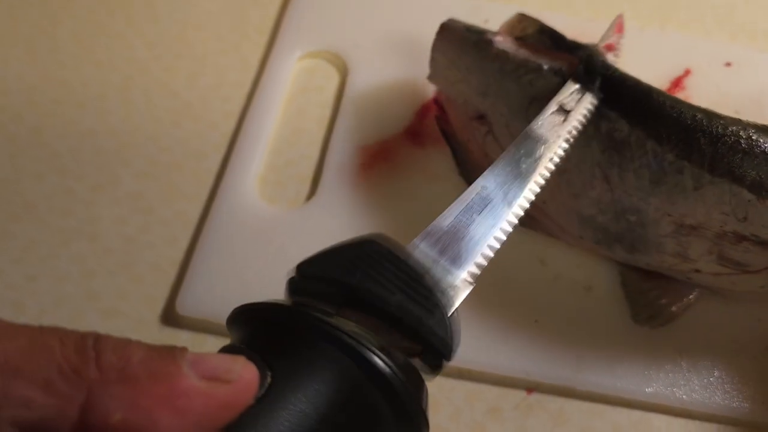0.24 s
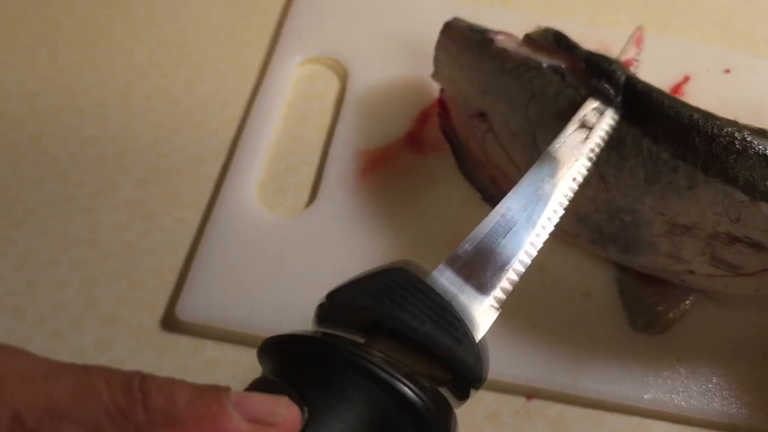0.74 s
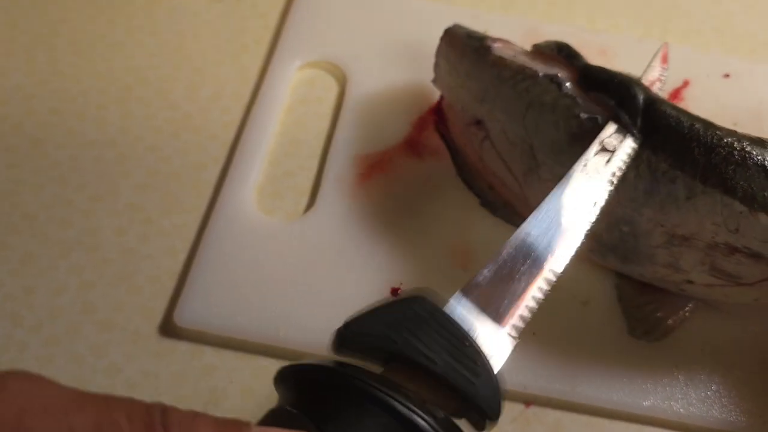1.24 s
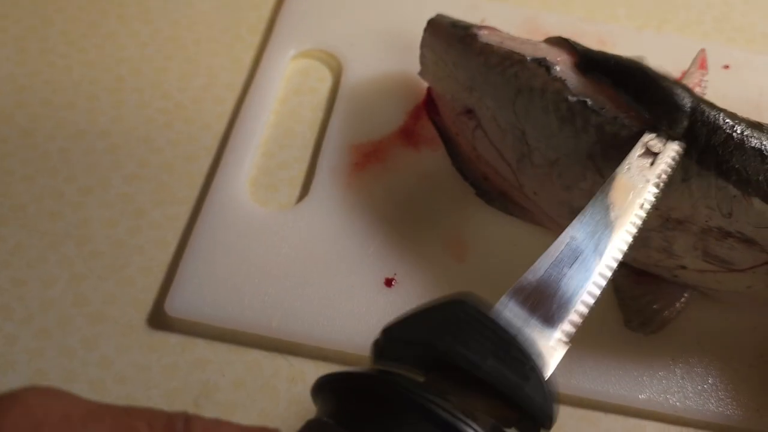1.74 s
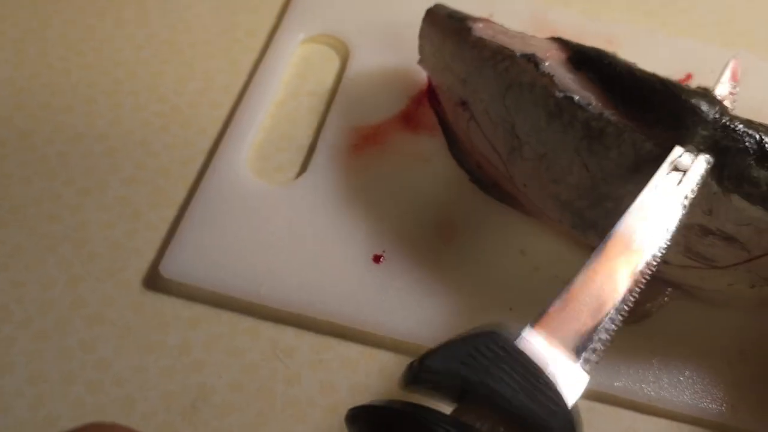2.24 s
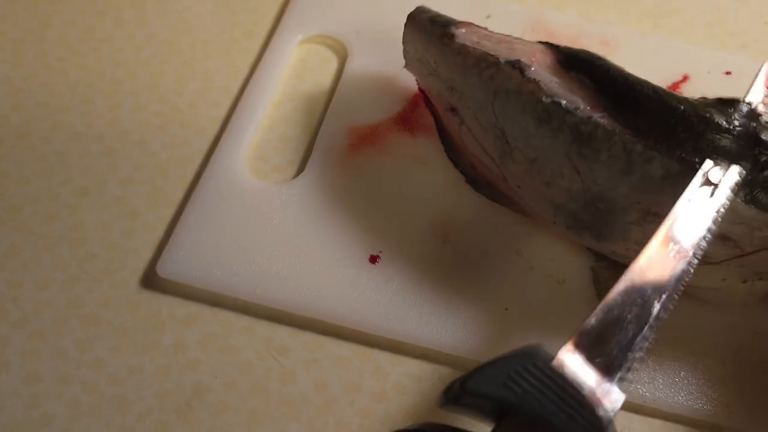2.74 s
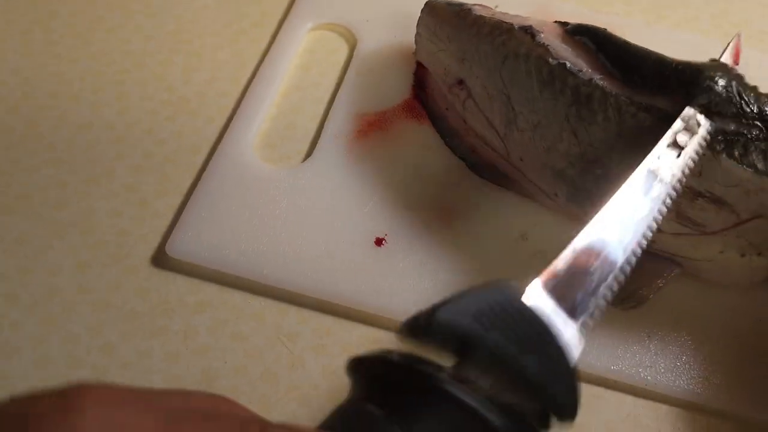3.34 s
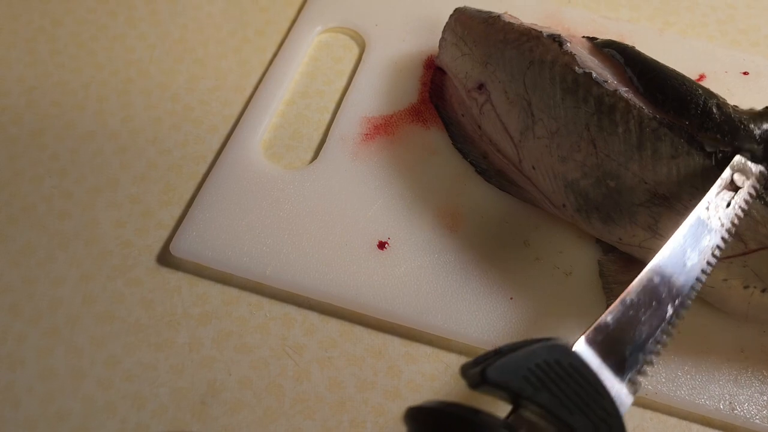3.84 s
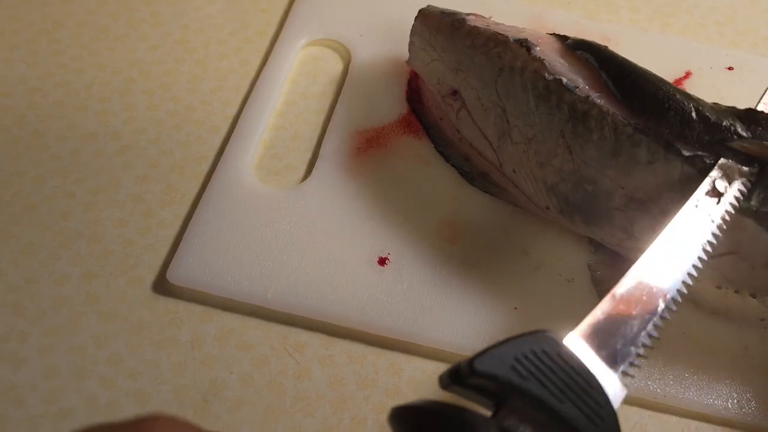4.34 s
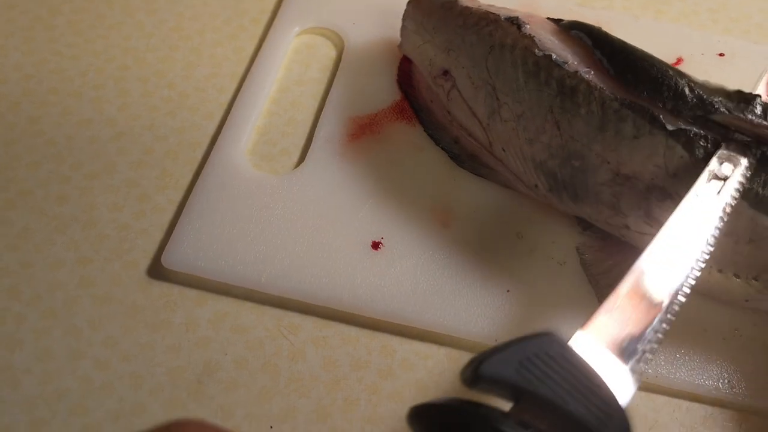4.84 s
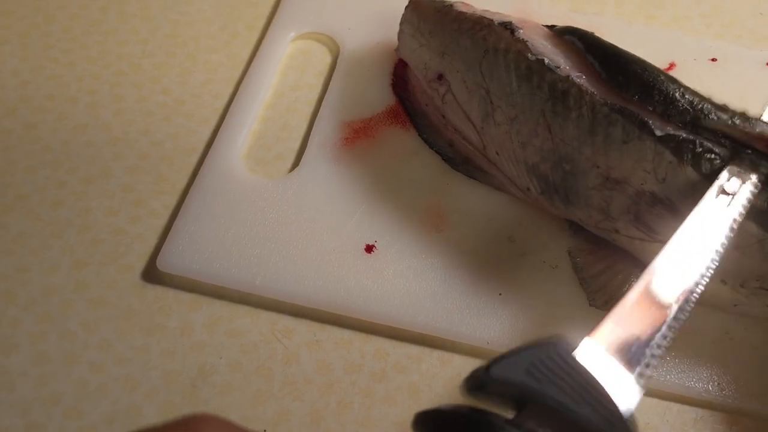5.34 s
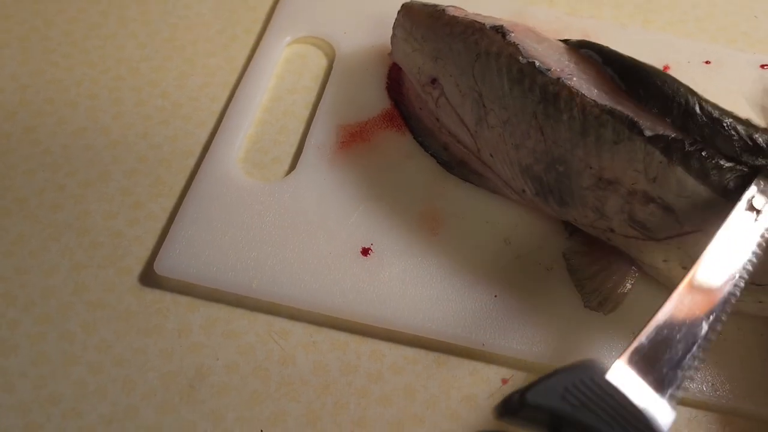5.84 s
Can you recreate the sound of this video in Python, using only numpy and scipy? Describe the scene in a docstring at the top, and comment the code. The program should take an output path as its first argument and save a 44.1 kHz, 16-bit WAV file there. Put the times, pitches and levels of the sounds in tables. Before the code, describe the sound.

Gritty, chattering buzz of an electric fillet knife cutting fish in a kitchen, winding down with loose clacks and starting again.

```python
"""A gritty, chattering buzz: an electric fillet knife is sawing through a fish on a kitchen board.
A geared motor drives two blades to and fro: steel rasps on steel, the drive knocks in its plastic
housing, the motor whines and the shaking handle hums. The knife coasts to a stop with loose clacks,
rests among soft rubs, bumps and ticks, then jolts back to speed. Counter and walls throw the rasp,
knocks, clacks and ticks back over a low room tone."""
import sys
import numpy as np
from scipy import signal
from scipy.fft import rfft, irfft, next_fast_len
from scipy.io import wavfile
from scipy.ndimage import uniform_filter1d

SR = 44100
rng = np.random.default_rng(int(sys.argv[2]) if len(sys.argv) > 2 else 0)


def master(y):
    """Save y as 16-bit WAV."""
    cut = np.clip(np.atleast_2d(y).T, -1, 1)
    pcm = np.round(cut * 32767)  # scale
    wavfile.write(sys.argv[1], SR, pcm.astype(np.int16))


N = 269451
T = np.arange(N) / SR
RELEASE_S, RESTART_S = 3.281, 4.645  # the trigger is let go, then squeezed again


def amp(db):
    """Decibels to gain."""
    return 10 ** (np.asarray(db) / 20)


def curve(rows):
    """Automation lane: straight lines through (time_s, value) rows."""
    return np.interp(T, *np.transpose(rows))


def swells(rows):
    """Bell-shaped fades up and down, one a row."""
    return sum(amp(db) * np.exp(-((T - middle) / half) ** 2) for middle, half, db in rows)


def at_pitch(rows, hz):
    """Reads (freq_hz, value) rows on a log-frequency axis."""
    freqs, values = np.transpose(rows)
    return np.interp(np.log(hz + 1), np.log(freqs + 1), values)


def add(mix, start_s, sound):
    """Drops a sound onto a mono or stereo track."""
    part = mix[..., round(start_s * SR):][..., :sound.shape[-1]]
    part += sound[..., :part.shape[-1]]


def colour(x, spectrum, modes=()):
    """Minimum-phase EQ of unit energy: a broad curve with resonant peaks on it."""
    hz = np.fft.rfftfreq(4096, 1 / SR)
    peaks = sum(amp(db) / (1 + (2 * (hz - pitch) / width) ** 2) for pitch, width, db in modes)
    gain = amp(at_pitch(spectrum, hz)) * (1 + peaks)
    log_gain = np.log(np.r_[gain, gain[-2:0:-1]])
    taps = np.fft.ifft(np.exp(np.conj(signal.hilbert(log_gain)))).real
    return signal.oaconvolve(x, taps / np.linalg.norm(taps))[:N]


def resonate(x, pitch_hz, width_hz):
    """Rings one damped mode."""
    pole = np.exp((2j * np.pi * pitch_hz - np.pi * width_hz) / SR)
    return signal.lfilter([1], [1, -pole], x).real


def drift(hz):
    """Random modulation of unit rms, rolling off above hz."""
    size = next_fast_len(N)
    rolloff = 1 + (np.fft.rfftfreq(size, 1 / SR) / hz) ** 4
    wander = irfft(rfft(rng.standard_normal(size)) / rolloff, size)[:N]
    return wander / np.sqrt(np.mean(wander ** 2))


def steady(x):
    """Leveller: rides a running sound towards unit rms."""
    power = uniform_filter1d(uniform_filter1d(x ** 2, 5000), 5000)
    return x / np.sqrt(abs(power) + np.mean(power) / 100)


def tones(turns, partials, waver_db):
    """Wavering sines on multiples of a rotation."""
    return sum(amp(db + waver_db * drift(hz=5.1)) * np.sqrt(2)
               * np.sin(2 * np.pi * (multiple * turns + rng.random())) for multiple, db in partials)


def once_a_stroke(strokes, place, jitter_s, spread_db):
    """One click each time the blades pass a place in the stroke, uneven in time and force."""
    when = np.interp(np.arange(int(strokes[-1])) + place, strokes, T)
    late, force = rng.standard_normal((len(when), 2)).T
    samples = np.round((when + jitter_s * late) * SR).astype(int)
    clicks = np.zeros(N)
    clicks[np.clip(samples, 0, N - 1)] = amp(spread_db * np.clip(force, -1.5, 1.2))
    return clicks


# Pace of the powered motor, sagging in the flesh: time_s, strokes_per_s
MOTOR_PACE = [(0, 37.23), (.75, 37.15), (1.5, 36.58), (1.9, 37.11), (2.2, 37.11), (2.55, 36.64),
              (3.1, 36.38), (3.3, 37.53), (5, 37.09), (5.45, 36.31), (5.65, 36.36), (6.1, 35.67)]

def stroke_rate(coast_s=1.439, friction_per_s2=24.22, spin_up_s=0.053):
    """Strokes a second: the motor runs, air drag and dry friction stop it, current spins it up."""
    pace = curve(MOTOR_PACE)
    brake = friction_per_s2 * coast_s
    coast = (np.interp(RELEASE_S, T, pace) + brake) * np.exp(-(T - RELEASE_S) / coast_s) - brake
    spin_up = pace * (1 - np.exp(-np.maximum(T - RESTART_S, 0) / spin_up_s))
    return np.where(T < RELEASE_S, pace, np.maximum(coast, spin_up))


# The blades slap together as they reverse: place_in_stroke, level_db, decay_strokes
BLADE_SLAPS = [(.925, 2.5, 0.037), (0.96, 5, 0.038), (.42, 3, 0.033), (.475, 3.5, 0.086)]
# Broad, gritty EQ of the rasp: freq_hz, gain_db
RASP_EQ = [(100, -12), (300, -6), (600, 1), (950, -4.5), (2000, 2), (2500, -1), (4200, -3), (5500, -1),
           (8000, -3), (9500, -2), (10100, -8), (12700, -8), (14500, -4.5), (16000, -12)]
# Resonances of the blades: pitch_hz, width_hz, gain_db
BLADE_RESONANCES = [(984, 124, 2.5), (3025, 250, -3.5), (4350, 720, -4), (7500, 200, -12), (8800, 580, -13),
                    (11460, 240, 0)]
# Bright sheen of slapped steel: freq_hz, gain_db
STEEL_EQ = [(1000, -26), (3300, -36), (4400, -20.5), (5500, -5), (6700, -9.5), (7350, -0.5), (8100, -6.5),
            (9300, -0.5), (10100, -13), (11500, -4), (12500, -9), (16000, -27)]
# Spells in which the blades also catch in mid-stroke: start_s, end_s
BLADE_CATCHES = [(1.56, 2.36), (3.29, 3.47)]

def blade_rasp(strokes, speed, bite_db, slide_db=-3.5, grain_db=2, catch_fade_s=0.35):
    """Steel slides on steel and flares at each slap; the long blades send each side different grit."""
    def flare(place, decay_strokes):
        clicks = once_a_stroke(strokes, place, jitter_s=0.00036, spread_db=2.5)
        fade = np.exp(-np.max(np.diff(strokes)) / decay_strokes)  # decay time is set at full speed
        return abs(uniform_filter1d(signal.lfilter([1], [1, -fade], clicks) ** 2, size=30))

    catching = sum(np.clip(np.minimum(T - start, end - T) / catch_fade_s + 0.5, 0, 1)
                   for start, end in BLADE_CATCHES)
    slap_power = sum(amp(db) ** 2 * flare(place, decay) for place, db, decay in BLADE_SLAPS)
    slap_power += (amp(1) * catching) ** 2 * flare(place=0.21, decay_strokes=0.077)
    slide = amp(slide_db) * np.where(T < RESTART_S, speed ** 0.36, 1)  # coasting leaves mostly slaps
    ring_gain = amp(-12 - 0.15 * bite_db + 5 * catching)  # flesh muffles the steel
    centre, *sides = rng.standard_normal((3, N))
    grain = amp(grain_db * np.clip(drift(hz=1450), -2, 1.6))
    pair = []
    for side in sides:
        grit = grain * (side + 0.24 * centre) * np.sqrt(slap_power + slide ** 2)
        rasp = steady(colour(grit, RASP_EQ, BLADE_RESONANCES))
        ring = steady(colour(rng.standard_normal(N) * np.sqrt(slap_power), STEEL_EQ))
        pair.append(rasp + ring_gain * ring)
    level_db = -26 - 0.03 * bite_db + 0.74 * catching + 0.5 * drift(hz=8.1)
    return amp(level_db) * np.array(pair)


# Play in the drive, taken up in every stroke: place_in_stroke, level_db
KNOCK_PATTERN = [(0.926, 1.5), (0.984, -11), (.085, -6.5), (0.208, -9.5), (0.336, -32.5), (.45, -6.5),
                 (0.525, -6.5), (0.569, -13), (.76, -11.5)]
# Boxy EQ of the plastic housing: freq_hz, gain_db
HOUSING_EQ = [(60, -19.5), (150, -17), (220, -4.5), (300, 0.5), (390, -8), (560, -4.5), (780, -8),
              (930, 0.5), (1400, 2), (2000, -2.5), (2800, -1.5), (6000, -31.5), (16000, -30)]
# Resonances of the housing: pitch_hz, width_hz, gain_db
HOUSING_RESONANCES = [(550, 59, -9), (955, 99, -3), (1300, 85, -9.5), (1570, 78, 0.5), (1888, 71, 7)]
# A growl and a drone swell against the knocks at some depths of the cut: middle_s, half_length_s, gain_db
GROWL_SWELLS = [(2.88, 0.46, -7), (4.9, 0.12, -10.5)]
DRONE_SWELLS = [(3.4, 0.74, -18.5), (5.68, 0.33, -7.5)]

def drive_knocks(strokes, speed, bite_db, rattle_db=-31, rise_db_per_s=0.65):
    """Crank and gear knock the housing; leaning on the blades wakes a growl and a lower drone."""
    clicks = np.zeros(N)
    for place, db in KNOCK_PATTERN:
        force = amp(db + 2.24 * drift(hz=1.2))
        loose_strokes = strokes + 0.004 * drift(hz=1.5)
        clicks += force * once_a_stroke(loose_strokes, place, jitter_s=0.00007, spread_db=1.5)
    rattle = amp(rattle_db) * rng.standard_normal(N)
    housing = steady(colour(speed * clicks + rattle, HOUSING_EQ, HOUSING_RESONANCES))
    growl_gain = amp(-24.5 + 0.8 * bite_db) + swells(GROWL_SWELLS)
    growl = growl_gain * steady(resonate(housing, pitch_hz=1320, width_hz=300))
    drone = swells(DRONE_SWELLS) * steady(resonate(housing, pitch_hz=524, width_hz=77))
    level_db = -35.5 + 0.31 * bite_db + rise_db_per_s * T + 1.13 * drift(hz=8)  # flesh loads the drive
    return amp(level_db) * steady(housing + growl + drone)


GEAR_RATIO, SLOTS = 100 / 12, 12  # motor turns a stroke, slots in the motor
# Partials of the whine: multiple_of_motor_speed, level_db
WHINE_PARTIALS = [(1, -14), (5.5, -20), (SLOTS, 0), (4 * SLOTS, -17)]
# How well the housing radiates the whine as its pitch passes: slot_pitch_hz, gain_db
WHINE_RADIATION = [(300, -35), (520, -13.5), (950, -6), (1400, -17), (2000, -28), (3300, -21), (3620, -1)]

def motor_whine(strokes, rate, bite_db, fade_db_per_s=0.5):
    """The motor's slots sing; play in the gear roughens the tone, most of all when it runs slack."""
    flutter_db = np.interp(rate, [0, rate.max()], [4, 1.5]) * drift(hz=90)
    level_db = -43 - 0.15 * bite_db - fade_db_per_s * T  # fades as the handle moves away
    level_db += at_pitch(WHINE_RADIATION, SLOTS * GEAR_RATIO * rate)
    turns = GEAR_RATIO * strokes + 0.0016 * drift(hz=20)
    return amp(level_db + flutter_db) * (rate > 0) * tones(turns, WHINE_PARTIALS, waver_db=1.5)


# Partials of the shaking handle: multiple_of_stroke_rate, level_db
SHAKE_PARTIALS = [(1, -59.5), (3, -50.5), (4, -56.5), (8, -51)]

def handle_hum(strokes, speed, board_db):
    """The blades shake the handle, and the board too, twice a stroke, as they bite."""
    board = amp(board_db) * tones(strokes, [(2, 0)], waver_db=0.45)
    shake = amp(0.43 * (board_db - np.median(board_db))) * tones(strokes, SHAKE_PARTIALS, waver_db=3.5)
    rumble_eq = [(20, -28), (60, -3), (115, -2.5), (170, -10.5), (400, -14), (2000, -46.5)]
    rumble = amp(-52) * colour(rng.standard_normal(N), rumble_eq)
    return speed ** 3 * (board + shake + rumble)  # slow blades hardly shake anything


# Dark EQ of the room tone: freq_hz, gain_db
ROOM_TONE_EQ = [(30, -20.5), (75, -3.5), (160, -21.5), (280, -27.5), (420, -31), (850, -31), (1200, -42.5),
                (3000, -51.5), (16000, -57.5)]
# Appliance hum: pitch_hz, level_db
APPLIANCE_HUM = [(75, -65.5), (120, -68.5), (240, -73.5)]

def room_tone():
    """A bed of low kitchen noise, mostly centred, with a faint appliance hum."""
    centre, *sides = (colour(rng.standard_normal(N), ROOM_TONE_EQ) for _ in range(3))
    return amp(-58) * (0.82 * centre + 0.36 * np.array(sides)) + tones(T, APPLIANCE_HUM, waver_db=1.5)


# Reverb time of the walls: freq_hz, t60_s
WALL_DECAY = [(100, 0.18), (1000, 0.32), (5000, 0.24), (16000, 0.057)]

def kitchen(x, counter_db, walls_db, counter_t60_s=0.021):
    """Adds reflections: the counter scatters a sound at once and the walls later."""
    t = T[:SR // 2]
    counter = rng.standard_normal((2, len(t))) * (t > 0.001) * amp(-60 * t / counter_t60_s)
    hz, when, spectra = signal.stft(rng.standard_normal((2, len(t))) * (t > 0.006), SR, nperseg=256)
    decay = amp(-60 * when / at_pitch(WALL_DECAY, hz)[:, None])
    walls = signal.istft(spectra * decay, SR, nperseg=256)[1][:, :len(t)]
    echoes = sum(amp(db) * tail / np.linalg.norm(tail, axis=1, keepdims=True)
                 for db, tail in [(counter_db, counter), (walls_db, walls)])
    return x + signal.fftconvolve(x, echoes, axes=1)[:, :N]


# EQ of a clack or tick: freq_hz, gain_db
CONTACT_EQ = [(200, -21.5), (900, -8.5), (3500, -9), (9000, -16), (16000, -24.5)]

def contact(db, t60_s, tilt_db_per_octave=0, rings=()):
    """One hit of steel and plastic: a short stereo noise burst through the blade resonances."""
    envelope = amp(db - 60 * T[:SR // 5] / t60_s)
    eq = [(hz, gain_db + tilt_db_per_octave * np.log2(hz)) for hz, gain_db in CONTACT_EQ]
    bursts = envelope * rng.standard_normal((2, len(envelope)))
    return np.array([colour(burst, eq, [*BLADE_RESONANCES, *rings]) for burst in bursts])


# Clacks of the wind-down, before the trim: start_s, level_db
CLACK_CUES = [(3.327, -9), (3.356, -11), (3.405, -18), (3.546, -20), (3.682, -16.5), (3.734, -21.5),
              (3.796, -20), (3.864, -29), (3.915, -26.5), (3.952, -30), (4.126, -32.5), (4.205, -46)]

def blade_clacks(trim_db=-7):
    """The slowing blades clack loosely together."""
    track = np.zeros((2, N))
    for start_s, db in CLACK_CUES:
        add(track, start_s, contact(db + trim_db, t60_s=0.024))
    return track


# Rubs as the knife slows and rests: middle_s, half_length_s, level_db
RUB_SWELLS = [(3.683, 0.22, -43.5), (4.125, 0.083, -53), (4.42, .11, -69)]

def soft_rubs(grain_db=3.5):
    """Dull, clumped friction of the fish and the grip."""
    eq = [(100, -15), (300, -16), (420, -12), (600, 5.5), (900, -1.5), (1200, -8.5), (1600, -1.5),
          (2400, -13), (5000, -8.5), (16000, -29)]
    force = swells(RUB_SWELLS) * amp(grain_db * drift(hz=90))
    return np.array([colour(force * rng.standard_normal(N), eq) for _ in range(2)])


# Soft, low thuds: start_s, level_db, pitch_hz
BUMP_CUES = [(3.76, -39, 80), (4.102, -35, 126), (4.127, -42, 292), (4.455, -48, 288), (4.468, -46, 120),
             (4.487, -52, 316)]

def board_bumps(t60_s=0.079, attack_s=0.00091):
    """The knife bumps the fish and board, each thud one quickly damped sine."""
    track, t = np.zeros(N), T[:SR // 4]
    envelope = amp(-60 * t / t60_s) * (1 - np.exp(-t / attack_s))
    for start_s, db, hz in BUMP_CUES:
        add(track, start_s, amp(db) * envelope * np.sin(2 * np.pi * hz * t))
    return track


# Tiny ticks, before the trim: start_s, level_db, tilt_db_per_octave, ring_hz
TICK_CUES = [(4.293, -42, 2, 12800), (4.303, -43, 3, 3200), (4.329, -46.5, 1.5, 7800),
             (4.416, -32, -3, 990), (4.465, -59, -1.5, 4200), (4.526, -62, 5, 9000), (4.548, -66, -3, 3800)]

def handling_ticks(trim_db=-7, t60_s=0.025, ring_db=18):
    """The resting knife ticks in the hand, each contact with a broad ring of its own."""
    track = np.zeros((2, N))
    for start_s, db, tilt, hz in TICK_CUES:
        add(track, start_s, contact(db + trim_db, t60_s, tilt, rings=[(hz, 0.43 * hz, ring_db)]))
    return track


def from_left(x, delay_s=0.00027):
    """The handle is on the left: its sound reaches the right channel later."""
    delay = np.exp(-2j * np.pi * np.fft.rfftfreq(N, 1 / SR) * delay_s)
    return np.array([x, irfft(rfft(x) * delay, N)])


def speed_gain(speed, coast_power, restart_power):
    """A fader that dies with the speed when coasting and comes back with a jolt at the restart."""
    return speed ** np.where(T < RESTART_S, coast_power, restart_power)


# How hard the blades bite, as the hum of the board shaken through the fish: time_s, level_db
BOARD_SHAKE = [(0, -43.5), (.7, -46.5), (1, -43), (1.42, -39.5), (1.6, -44.5), (2.05, -47.5), (2.3, -38.5),
               (2.75, -32.5), (3.22, -33), (3.38, -52.5), (4.8, -39.5), (5.02, -46.5), (5.12, -36),
               (5.4, -36), (5.78, -37.5), (6, -34.5)]

def scene(usual_board_db=-41.5):
    """The mix: stroke rate and bite play the knife, and the kitchen surrounds it."""
    rate = stroke_rate()
    strokes, speed = np.cumsum(rate) / SR, rate / rate.max()
    board_db = curve(BOARD_SHAKE)
    bite_db = uniform_filter1d(board_db, size=8000) - usual_board_db
    rasp = blade_rasp(strokes, speed, bite_db) * speed_gain(speed, 1.96, restart_power=0.95)
    knocks = drive_knocks(strokes, speed, bite_db) * speed_gain(speed, 1.57, restart_power=0.56)
    steel = kitchen(rasp + blade_clacks() + handling_ticks(), counter_db=-8, walls_db=-16.5)
    plastic = kitchen(from_left(knocks), counter_db=-9.5, walls_db=-9.5)
    pan_db = 1.91 - 0.0848 * T  # the knife starts on the left and works towards the middle
    knife = (steel + plastic + motor_whine(strokes, rate, bite_db)) * amp([pan_db, -pan_db])
    hum = handle_hum(strokes, speed, board_db) * amp([[0.5], [-0.5]])  # just left of centre
    return knife + hum + room_tone() + soft_rubs() + board_bumps()


def record(dry, cutoff_hz=15950):
    """A steep low-pass takes the very top off the mix."""
    lowpass = signal.firwin(1023, cutoff_hz, window=("kaiser", 9), fs=SR)
    return signal.oaconvolve(dry, lowpass[None], "same")


dry = scene()
out = record(dry)
master(out)
```